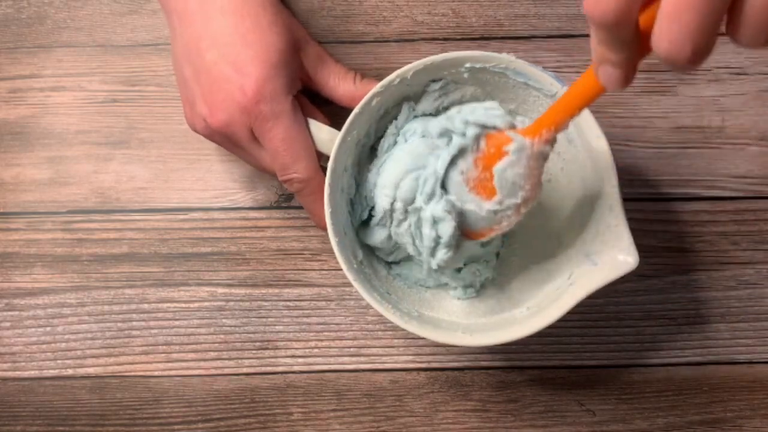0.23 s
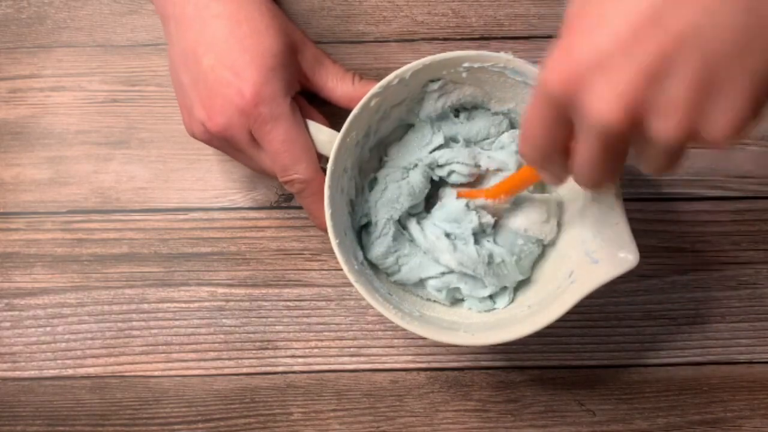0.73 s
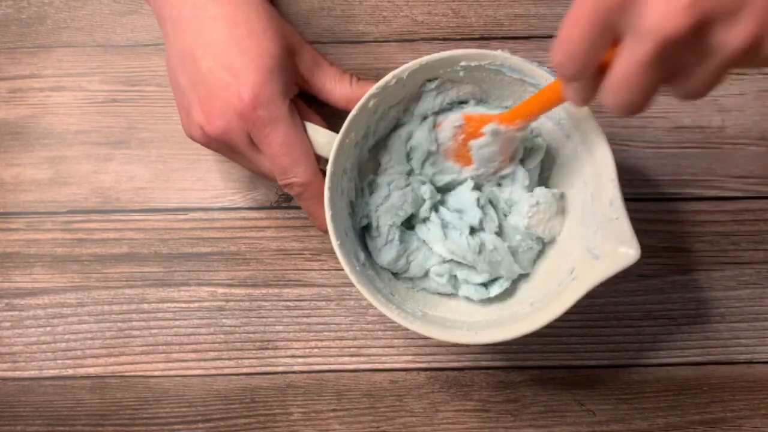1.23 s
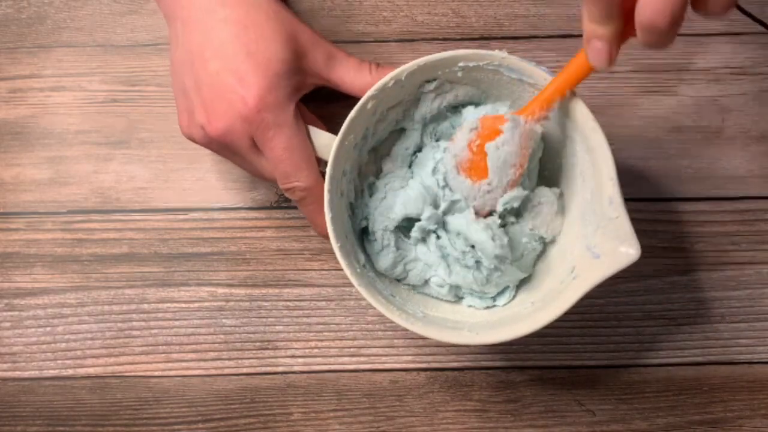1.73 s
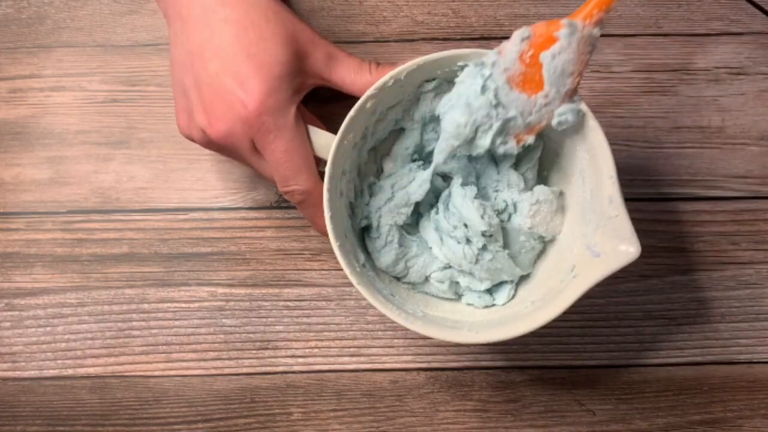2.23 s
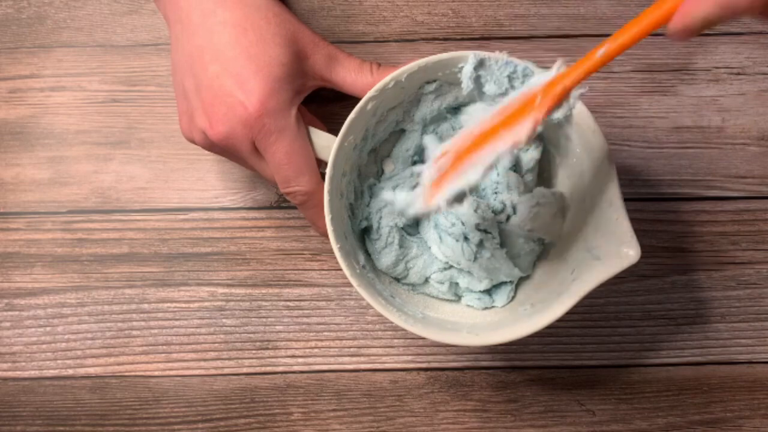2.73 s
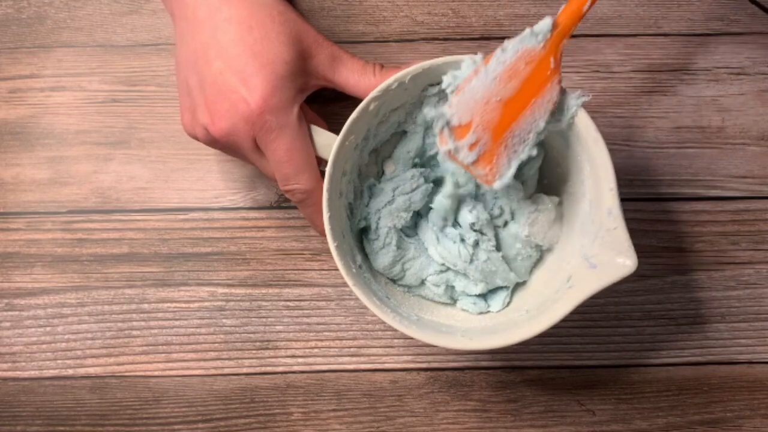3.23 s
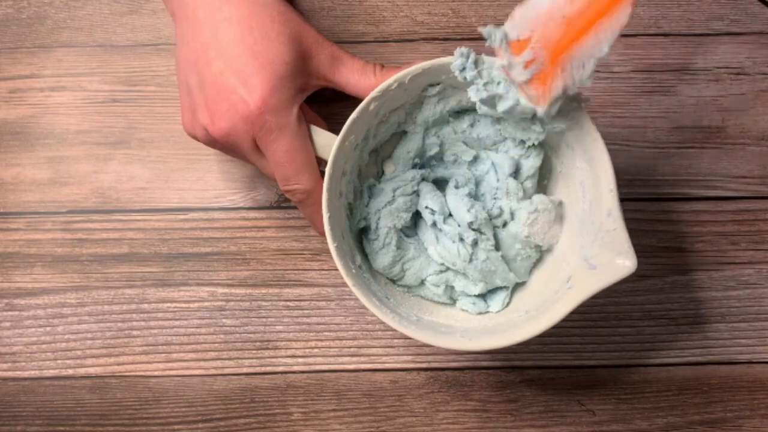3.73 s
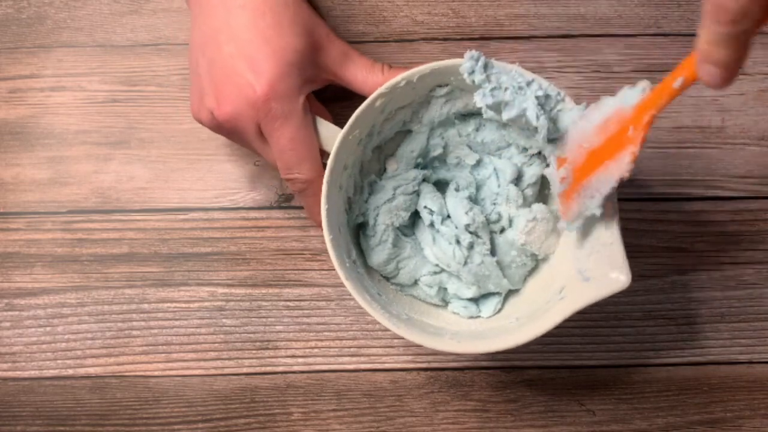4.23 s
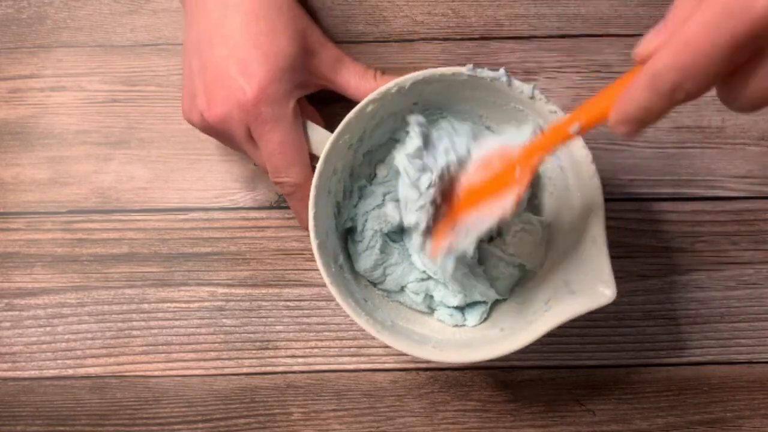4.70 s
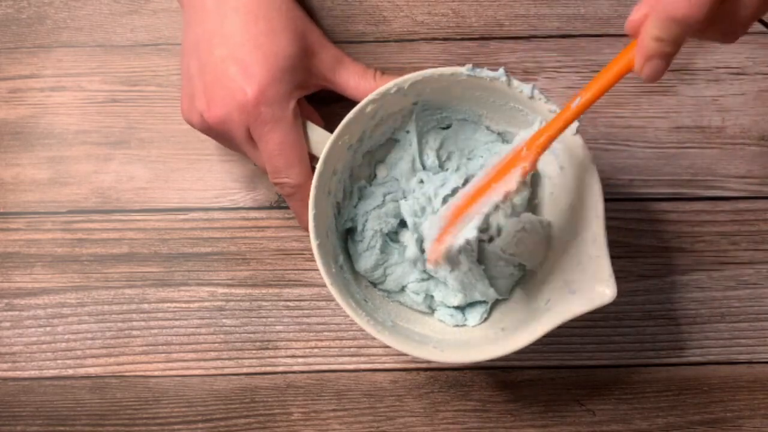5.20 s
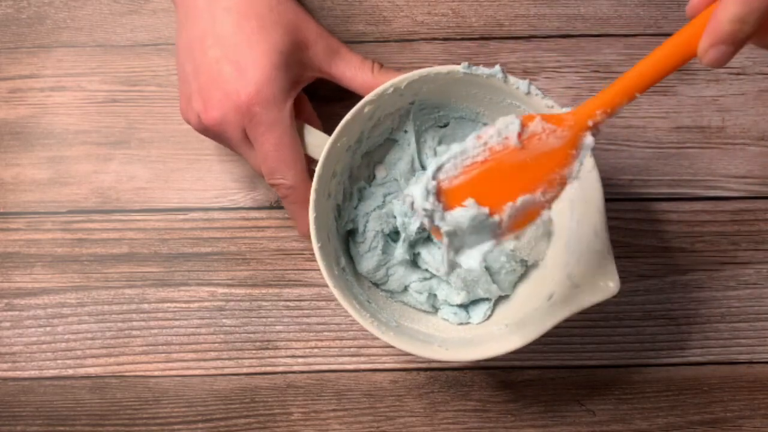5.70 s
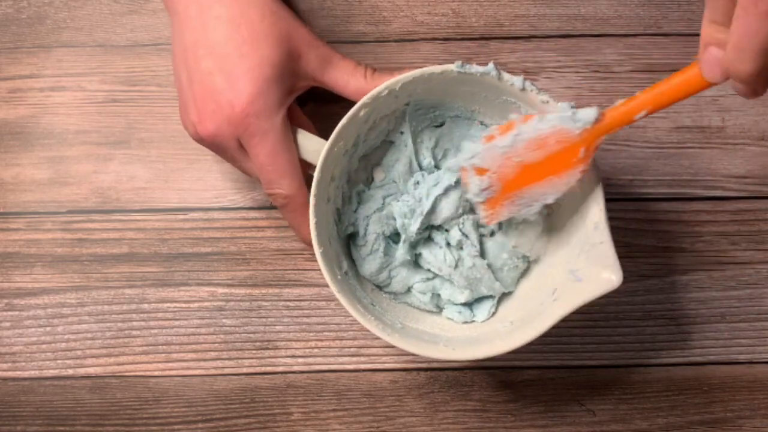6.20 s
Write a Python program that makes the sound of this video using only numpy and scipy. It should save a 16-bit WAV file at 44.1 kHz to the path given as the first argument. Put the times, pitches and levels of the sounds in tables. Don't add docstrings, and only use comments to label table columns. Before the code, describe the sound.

In a quiet indoor room with low electrical hum and faint hiss, a soft blade rubs gritty paste against a glazed bowl in irregular short strokes. Tiny crisp snaps mark the paste parting, clustering around the middle. Dull knocks with a low table thump stand far above the soft rubbing, the loudest early and at the very end. Pauses leave mostly room tone. Close single microphone, short room reflections, practically centred sound.

```python
import sys
import numpy as np
from scipy import signal
from scipy.fft import rfft, irfft
from scipy.io import wavfile

SR = 44100
rng = np.random.default_rng(int(sys.argv[2]) if len(sys.argv) > 2 else 0)


def int16_out(signal):
    q = np.round(np.clip(np.atleast_2d(signal).T, -1, 1) * 32767)
    wavfile.write(sys.argv[1], SR, q.astype(np.int16))


def to_linear_factor(level_db):
    exponent = np.asarray(level_db, float) / 20
    return 10 ** exponent


N = 284533


def rms_one(x):
    return x / np.sqrt(np.mean(x ** 2) + 1e-20)


def peak_one(x):
    return x / np.abs(x).max()


def add_at(out, s, sound):
    at = round(s * SR)
    out[at:at + len(sound)] += sound[:N - at]


def in_time(rows):
    s, *columns = np.transpose(rows)
    return [np.interp(np.arange(N) / SR, s, c) for c in columns]


def at_hz(points, hz):
    point_hz, values = np.transpose(points)
    return np.interp(np.log(hz), np.log(point_hz), values)


def drift(rate_hz):
    r = np.exp(-2 * np.pi * rate_hz / SR)
    slow = signal.lfilter([1], [1, -2 * r, r * r], rng.standard_normal(N + SR))
    return rms_one(slow[SR:])


def ring(clicks, hz, t60):
    r = to_linear_factor(-60 / (t60 * SR))
    w = 2 * np.pi * hz / SR
    return signal.lfilter([0, np.sin(w)], [1, -2 * r * np.cos(w), r * r], clicks + 1e-18)


def resonate(x, hz, width):
    r = np.exp(-np.pi * width / SR)
    top_gain = (1 - r * r) / 2
    return signal.lfilter(np.array([1, 0, -1]) * top_gain, [1, -2 * r * np.cos(2 * np.pi * hz / SR), r * r], x)


def resonate_twice(x, hz, width):
    return resonate(resonate(x, hz, width), hz, width)


# frequency in Hz, level in dB per Hz.
AIR = [(8, -56), (28, -67.5), (70, -88), (140, -85), (220, -91.5), (480, -94), (900, -101), (2600, -116)]
# frequency in Hz, level in dB per Hz.
STEADY_HISS = [(900, -110), (1800, -108), (2600, -114.5), (5000, -117.5), (12300, -123), (13000, -135),
               (16000, -137)]
# frequency in Hz, width in Hz, rms level in dB.
VENTILATION = [(60, 13.7, -65), (123.9, 6.4, -74)]
MAINS_HZ, MAINS_DB = 59.8, -54.5
WHINE_HZ, WHINE_DB = 1310, -72


def air():
    t = np.arange(N) / SR
    hz = np.arange(1, N // 2 + 2) * SR / N
    white = rfft(rng.standard_normal(N)) * np.sqrt(SR / 2)
    room_air = to_linear_factor(at_hz(AIR, hz)) * (hz < AIR[-1][0])
    noise = irfft(white * np.hypot(room_air, to_linear_factor(at_hz(STEADY_HISS, hz))), N)
    hums = sum(to_linear_factor(db) * rms_one(resonate_twice(rng.standard_normal(N), f, width))
               for f, width, db in VENTILATION)
    mains = to_linear_factor(MAINS_DB) * np.sin(2 * np.pi * MAINS_HZ * t)
    whine = to_linear_factor(WHINE_DB + 0.4 * drift(11.0)) * np.sqrt(2) * np.sin(2 * np.pi * WHINE_HZ * t)
    return noise + hums + mains + whine


# start in seconds, end in seconds, grain hiss in dB, rasp through
# the bowl wall in dB, rasp tilt in dB per octave (high on the wall is bright).
STROKES = [(0.0, 0.282, -79.5, -67, 5), (0.435, 0.548, -67.5, -58.5, 11), (0.586, 0.787, -69.5, -58, 6.5),
           (0.83, 0.883, -67, -58.5, 3), (0.867, 0.882, -67, -54.5, 8), (0.97, 1.183, -83, -76, 9),
           (1.273, 1.333, -69.5, -63.5, 23), (1.37, 1.425, -65, -59.5, 4), (1.522, 1.558, -68, -62.5, 5),
           (1.62, 1.98, -87, -72, 0.4), (2.03, 2.2, -83.5, -75, -2), (2.23, 2.29, -75, -66.5, 8),
           (2.41, 2.531, -69.5, -66, -1), (3.037, 3.018, -73.5, -72, -9), (3.19, 3.258, -67.5, -61.5, -1.5),
           (3.28, 3.48, -75.5, -72.5, -5), (3.517, 3.66, -78.5, -79.5, -20), (3.697, 3.73, -74, -69, -8),
           (4.322, 4.43, -77.5, -73, 8), (4.49, 4.58, -65.5, -66.5, 32), (4.607, 4.657, -72.5, -63, -8.5),
           (5.12, 5.24, -80, -94, 3), (5.22, 5.262, -80, -78, 16), (6.38, 6.437, -70.5, -63, -11)]
ATTACK_DB_PER_S, RELEASE_DB_PER_S = 135, 283
REST_HISS_DB, REST_RASP_DB, REST_TILT_DB = -89.5, -79.5, -11


def strokes():
    t = np.arange(N) / SR
    hiss, rasp = to_linear_factor(2 * REST_HISS_DB), to_linear_factor(2 * REST_RASP_DB)
    tilt = rasp * REST_TILT_DB
    for start, end, hiss_db, rasp_db, tilt_db in STROKES:
        rise_db = -ATTACK_DB_PER_S * np.clip(start - t, 0, 1)
        fall_db = -RELEASE_DB_PER_S * np.clip(t - end, 0, 1)
        shape_db = rise_db + fall_db
        wall = to_linear_factor(2 * (rasp_db + shape_db))
        hiss = hiss + to_linear_factor(2 * (hiss_db + shape_db))
        rasp = rasp + wall
        tilt = tilt + wall * tilt_db
    return 10 * np.log10(hiss), 10 * np.log10(rasp), tilt / rasp


def grains(per_s, spread_db, modes, patchy_db, tilt_db):
    out, centre = 0, modes[len(modes) // 2][0]
    for hz, width, db in modes:
        sizes = to_linear_factor(spread_db * np.minimum(rng.exponential(1, N), 5)) * rng.choice([-1, 1], N)
        slips = rms_one(sizes * (rng.random(N) < per_s / SR))
        octaves = np.clip(np.log2(hz / centre), -.6, .6)
        gain = to_linear_factor(db + tilt_db * octaves + patchy_db * drift(14.0))
        out = out + gain * rms_one(resonate_twice(slips, hz, width * 1.5))
    return out / np.sqrt(np.sum(to_linear_factor(np.array(modes)[:, 2]) ** 2))


# frequency in Hz, width in Hz, level in dB.
HISS = [(3330, 3400, -5), (6400, 1900, 2), (7500, 1400, -3), (9300, 2300, -5.5), (14100, 4800, -7)]
# frequency in Hz, width in Hz, level in dB.
RASP = [(852, 413, 11), (1065, 570, -4), (1480, 510, 5.5), (2000, 140, -9), (2150, 360, -6.5)]
# frequency in Hz, width in Hz, level in dB.
RUB = [(306, 390, -11), (430, 166, 17.5), (560, 73, 12.5)]
# time in seconds, rub level in dB.
WEIGHT = [(0.0, -60.5), (0.6, -65), (0.9, -63), (1.0, -76), (1.27, -72), (1.36, -59.5), (1.6, -60.5),
          (1.95, -67), (2.35, -66), (2.53, -61), (2.62, -73), (3.04, -63), (4.3, -70), (4.64, -59),
          (4.9, -67.5), (5.4, -68), (6.25, -66.5), (6.42, -57.5)]
HISS_TILT_DB, HISS_TILT_PER_DB, FIRM_DB = 3, 0.39, -68


def stirring():
    hiss_db, rasp_db, rasp_tilt_db = strokes()
    rub_db = in_time(WEIGHT)[0]
    hiss_tilt_db = HISS_TILT_DB + HISS_TILT_PER_DB * (hiss_db - FIRM_DB)
    catch = to_linear_factor(1.3 * drift(30.0))
    hiss = to_linear_factor(hiss_db + .3) * grains(5000, 3.2, HISS, 1.2, hiss_tilt_db)
    rasp = to_linear_factor(rasp_db + .3) * grains(2000, 3.1, RASP, 1.1, rasp_tilt_db)
    rub = to_linear_factor(rub_db - 1.5) * grains(1500, 3.0, RUB, 1.5, 0)
    return catch * (hiss + rasp + rub)


# start in seconds, peak level in dB, centre in Hz, bright edge in dB,
# knock in the bowl wall in dB.
TICKS = [(0.0632, -51, 7860, -3, 2), (1.5228, -46.5, 5550, -14, 3), (1.5418, -38.5, 5970, -20, 7),
         (1.5637, -41, 8100, -11, 14.5), (1.7556, -40, 6700, -15, 12.5), (2.2043, -49, 7200, -34, 2),
         (2.4218, -53, 8650, -9, 0), (2.4896, -42, 8160, -8, 3.5), (2.5096, -49, 8200, -19, -4),
         (2.6024, -44.5, 8500, -18, -8.5), (2.6183, -48, 9100, -17, -30), (2.9576, -61, 4480, -14, 31),
         (3.0254, -48, 7300, -9, 2), (3.1561, -48, 9260, 2, -19), (3.1701, -45, 8600, 0, -13),
         (3.203, -42.5, 7500, -16, -3), (3.2958, -43.5, 8440, -8, -2), (3.3317, -36.5, 6800, -14, -1),
         (3.3487, -45, 8300, -15, 9), (3.5512, -52.5, 8900, -10, 4), (3.7977, -42, 9300, -16, -2.5),
         (4.4392, -45.5, 6600, -16, -4), (4.5619, -46.5, 7800, -8, 0), (6.3118, -32.5, 11600, -16, 16)]
# start in seconds, peak level in dB.
THREADS = [(0.7686, -64), (1.4924, -51), (1.6535, -59), (2.115, -62), (2.149, -55), (2.158, -55),
           (2.3041, -53), (2.3998, -52), (2.4328, -52), (2.557, -52), (2.639, -52), (3.2725, -52),
           (3.3018, -53), (3.3595, -55), (3.438, -52), (3.7055, -53), (3.721, -58), (3.7657, -56),
           (3.773, -59), (3.803, -51), (4.3145, -63), (4.6427, -58), (4.6886, -56), (5.0263, -52.5),
           (5.0323, -54), (5.1506, -56), (5.1616, -52), (5.2474, -57), (6.4167, -53), (6.4417, -53)]
THREAD_HZ, THREAD_EDGE_DB, THREAD_WALL_DB = 8000, -10, -10.5
TICK_MS, WALL_DB_PER_DOUBLING = 2.1, 17


def ticks():
    out, t = np.zeros(N), np.arange(700) / SR
    rows = list(TICKS) + [(s, db, THREAD_HZ, THREAD_EDGE_DB, THREAD_WALL_DB) for s, db in THREADS]
    for s, db, hz, edge_db, wall_db in rows:
        decay_ms = np.clip(TICK_MS * 2 ** (wall_db / WALL_DB_PER_DOUBLING), .3, 8)
        burst = rng.standard_normal(len(t)) * np.exp(-t * 1000 / decay_ms)
        own = resonate_twice(burst, hz, 0.59 * hz)
        edge = resonate_twice(burst, 13800, 8000)
        wall = resonate_twice(burst, 2020, 1300) + to_linear_factor(-10.5) * resonate_twice(burst, 2900, 1900)
        tick = own + to_linear_factor(edge_db) * edge + to_linear_factor(wall_db) * wall
        add_at(out, s, to_linear_factor(db - 0.5) * peak_one(tick))
    return out


# middle in seconds, length in seconds,
# wall resonance in Hz, level in dB.
CHATTER = [
    (0.874, 0.035, 1770, -55.5),
    (1.55, 0.045, 3700, -70),
    (3.336, 0.033, 2000, -65),
    (4.503, 0.14, 2170, -72.5),
]
CHATTER_PER_S, CHATTER_WIDTH = 900, 0.17


def chatter():
    out, t = 0, np.arange(N) / SR
    slips = rng.standard_normal(N) * (rng.random(N) < CHATTER_PER_S / SR)
    for s, length, hz, db in CHATTER:
        swell = np.exp(-(2 * (t - s) / length) ** 2)
        out = out + to_linear_factor(db) * swell * rms_one(resonate_twice(slips, hz, CHATTER_WIDTH * hz))
    return out


# start in seconds, strength in dB (the push itself peaks 16 dB lower or a
# little more), frequency in Hz.
ROCKS = [
    (0.928, -42, 107),
    (1.689, -27.5, 119),
    (1.778, -17.5, 60),
    (2.537, -35, 114),
    (3.118, -42, 104),
    (4.387, -33, 116),
    (4.749, -55, 107.4),
    (6.336, -16, 60),
]
# time in seconds, hum level in dB.
DRAG = [(5.19, -100), (5.21, -37.5), (5.27, -45.5), (5.33, -68), (5.36, -96)]
# frequency in Hz, width in Hz, level in dB.
DRAG_MODES = [(332, 20, -18.5), (408, 4.7, -8.5)]


def rocking():
    legs, t = np.zeros(N), np.arange(int(.4 * SR)) / SR
    swell = t / 0.049 * np.exp(1 - t / 0.008)
    for s, db, hz in ROCKS:
        add_at(legs, s, to_linear_factor(db) * swell * np.sin(2 * np.pi * hz * t))
    hum = sum(to_linear_factor(db) * rms_one(resonate(rng.standard_normal(N), hz, width)) for hz, width, db in DRAG_MODES)
    return legs + to_linear_factor(in_time(DRAG)[0]) * hum


# start in seconds, peak level in dB, pulse frequency in Hz,
# ringing of the body in dB, hard edge in dB, the last two against the peak.
KNOCKS = [(1.679, -37.5, 560, -6.5, -33), (1.7447, -38, 620, -6, -27), (1.7552, -11.5, 752, -10.5, -12.5),
          (2.6844, -17, 657, -4.5, -14), (3.022, -50.5, 445, -7, -30), (3.084, -33.5, 620, -1, -20.5),
          (3.27, -47, 1100, -7, -24), (3.331, -34, 926, -6.5, -16.5), (3.347, -42, 1060, -10, -23),
          (4.365, -54.5, 455, -2, -30), (4.708, -35, 638, -4, -22), (6.3153, -10.5, 733, -12.5, -13.5)]
# delay in ms, level in dB.
EARLY = [(2.4, 1.5), (3.7, -8), (4.9, -12), (6.2, -4), (8.7, -12), (11.2, -10), (12.6, -14), (14.5, -15),
         (17.5, -14)]
# frequency in Hz, level in dB, t60 in seconds.
GLAZE = [(1365, 0.5, 0.027), (1545, 1.5, 0.012), (1873, -3.5, 0.12), (2166, -7, 0.007), (2685, -11, 0.045),
         (3480, -9.5, 0.0074)]
# frequency in Hz, level in dB, t60 in seconds.
BODY = [(249, -5, 0.3), (331.6, 4.5, 0.065), (377, 3.5, 0.12), (421, 10.5, 0.03), (556.2, 7.5, 0.092),
        (561.6, -0.5, 0.16), (644, -9, 0.072), (644, -6.5, 0.013), (766, -2, 0.079), (856, 5, 0.017),
        (1022, -1.5, 0.066), (1088, -1, 0.053)]
# frequency in Hz, level in dB, t60 in seconds.
THUMP = [(110.5, 9.5, 0.19), (169.6, 8.5, 0.079)]
THUMP_DB, THUMP_DB_PER_OCTAVE, THUMP_LEAST_DB = -20, -65.5, -37


def knocks():
    out, t = np.zeros(N), np.arange(int(.5 * SR)) / SR
    for s, db, pulse_hz, ring_db, edge_db in KNOCKS:
        own_db = rng.normal(0, 1.5, len(BODY))
        thump_db = np.clip(THUMP_DB + THUMP_DB_PER_OCTAVE * np.log2(pulse_hz / 700), THUMP_LEAST_DB, -6)
        force = np.exp(-(np.pi * (pulse_hz * t - 1)) ** 2)
        pulse = np.cos(2 * np.pi * (pulse_hz * t - 1.04)) * force ** .4
        graze = np.exp(-(np.pi * 3000 * (t - .0006)) ** 2)
        edge = sum((-1) ** k * to_linear_factor(g) * ring(graze, hz, t60) for k, (hz, g, t60) in enumerate(GLAZE))
        pulse = pulse + to_linear_factor(edge_db) * peak_one(edge)
        direct = pulse + sum(to_linear_factor(g) * np.roll(pulse, int(ms * SR / 1000)) for ms, g in EARLY)
        body = sum((-1) ** k * to_linear_factor(g + own_db[k]) * ring(pulse, hz, t60)
                   for k, (hz, g, t60) in enumerate(BODY))
        legs = sum(to_linear_factor(g) * ring(force, hz, t60) for hz, g, t60 in THUMP)
        legs = legs * (1 - np.exp(-t / 0.0043))
        hit = peak_one(direct) + to_linear_factor(ring_db) * peak_one(body) + to_linear_factor(thump_db) * peak_one(legs)
        add_at(out, s, to_linear_factor(db) * hit)
    return out


# frequency in Hz, t60 in seconds.
ROOM_T60 = [(100, 0.59), (300, 0.35), (1000, 0.3), (3000, 0.29), (10000, 0.13)]
ROOM_DB, ROOM_ONSET_S = -14, 0.0078


def room(x):
    t, tail = np.arange(SR // 2) / SR, 0
    for low in 60 * 2.0 ** np.arange(8):
        octave = signal.butter(2, [low, 2 * low], "band", fs=SR, output="sos")
        band = signal.sosfilt(octave, rng.standard_normal(len(t)))
        tail = tail + band * to_linear_factor(-60 * t / at_hz(ROOM_T60, 1.4 * low))
    tail = tail * np.clip(t / ROOM_ONSET_S - 1, 0, 1)
    return to_linear_factor(ROOM_DB) * signal.fftconvolve(x, tail / np.sqrt(np.sum(tail ** 2)))[:N]


def scene():
    hits = knocks() + ticks()
    mono = air() + stirring() + chatter() + rocking() + hits + room(hits)
    return np.stack([mono, mono])


def low_pass(x):
    return signal.sosfilt(signal.butter(12, 16420, fs=SR, output="sos"), x)


CUTOFF_HZ = 16400
RIGHT_LAG = 23


def record(dry):
    dry = signal.sosfilt(signal.cheby2(10, 50, CUTOFF_HZ, fs=SR, output="sos"), dry)
    right = np.concatenate([np.full(RIGHT_LAG, dry[1, 0]), dry[1, :-RIGHT_LAG]])
    return low_pass(np.stack([dry[0], right]))


dry = scene()
out = record(dry)
int16_out(out)
```